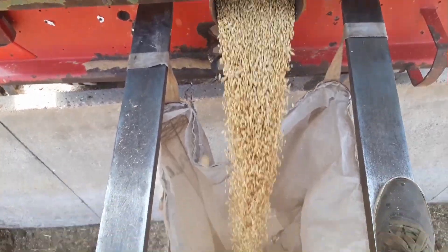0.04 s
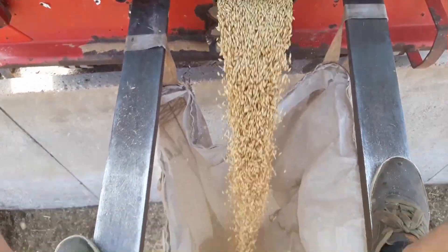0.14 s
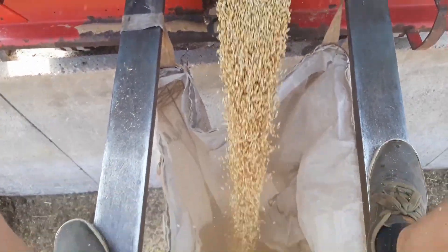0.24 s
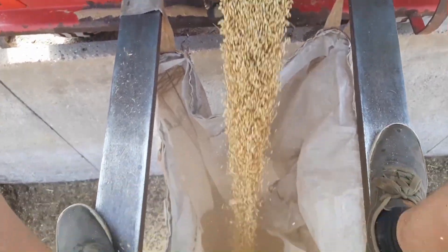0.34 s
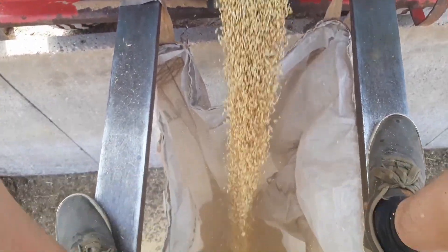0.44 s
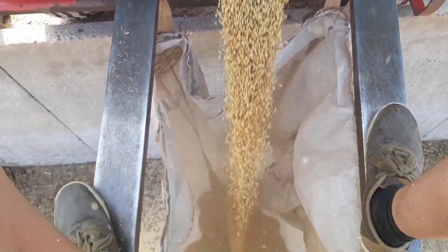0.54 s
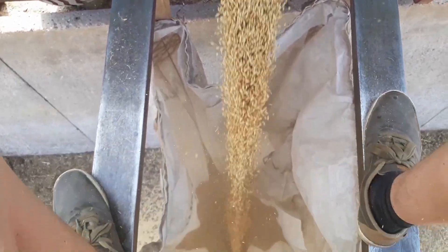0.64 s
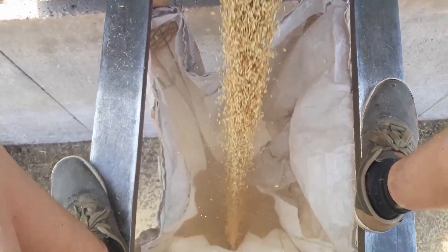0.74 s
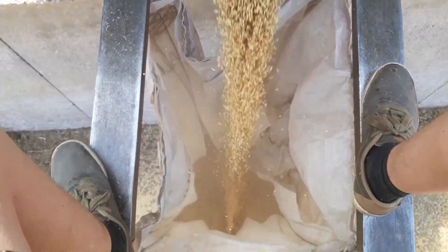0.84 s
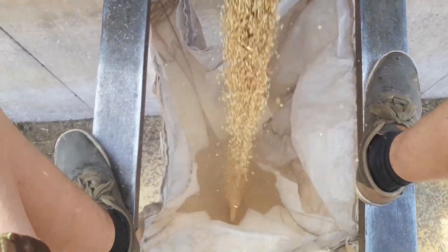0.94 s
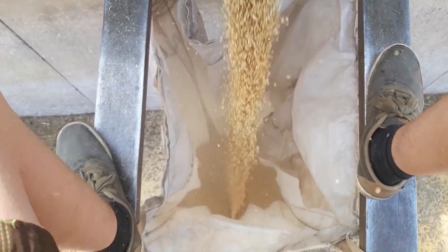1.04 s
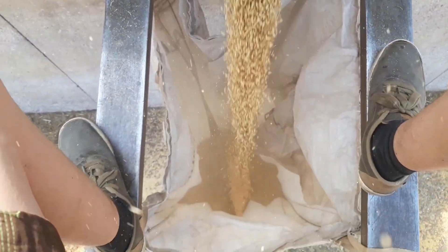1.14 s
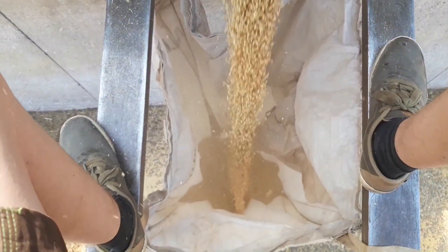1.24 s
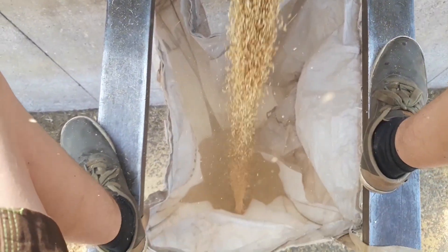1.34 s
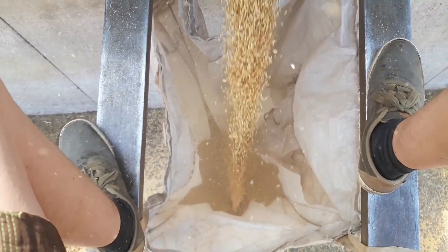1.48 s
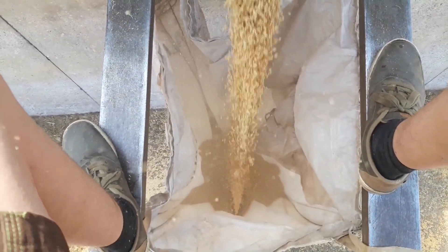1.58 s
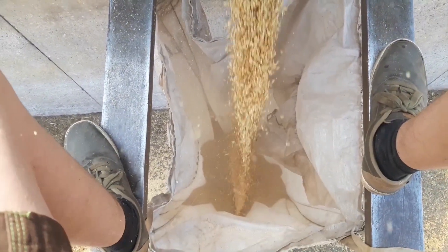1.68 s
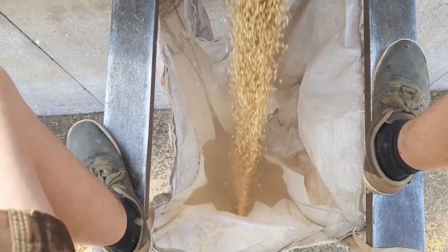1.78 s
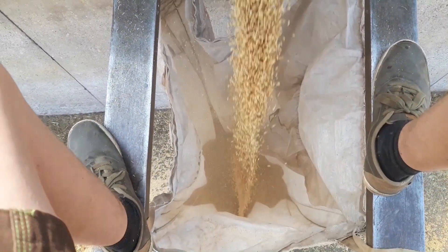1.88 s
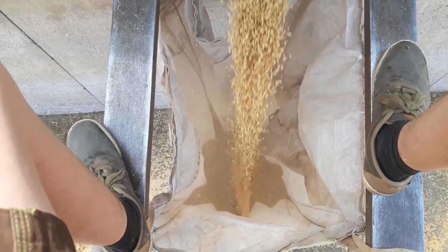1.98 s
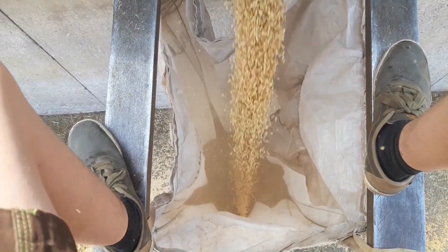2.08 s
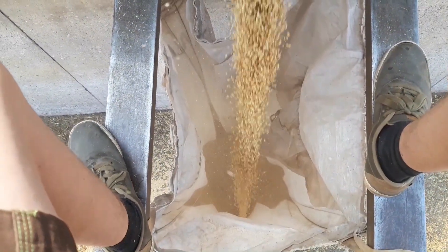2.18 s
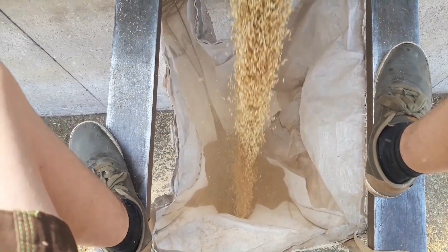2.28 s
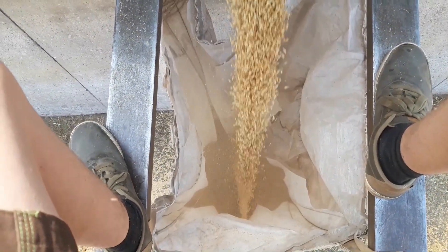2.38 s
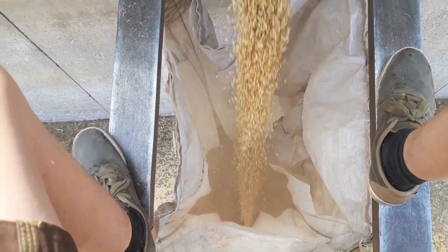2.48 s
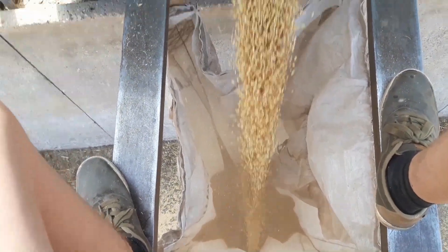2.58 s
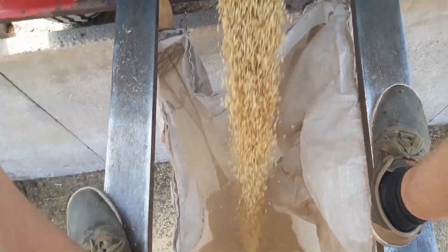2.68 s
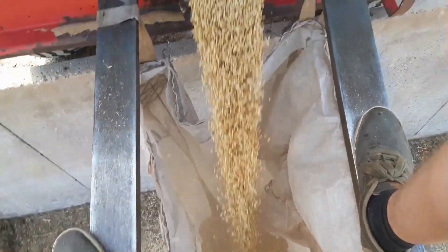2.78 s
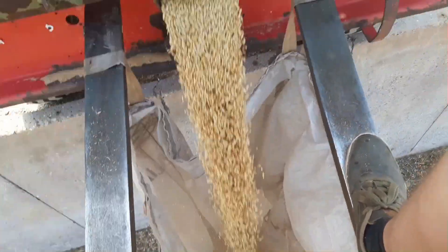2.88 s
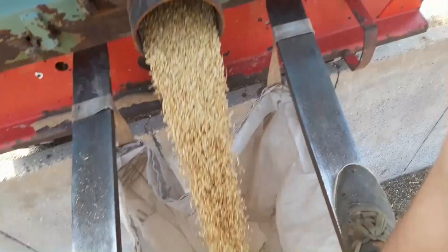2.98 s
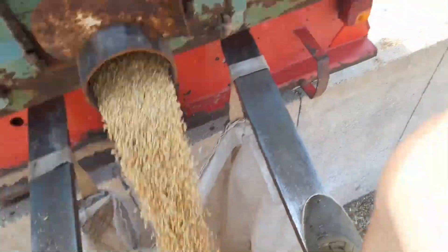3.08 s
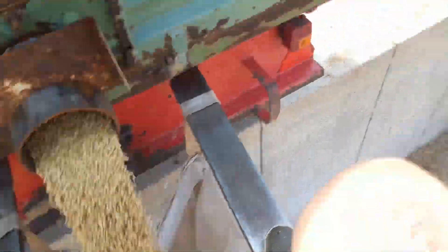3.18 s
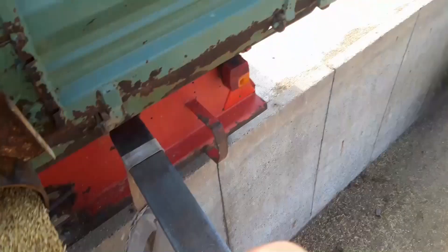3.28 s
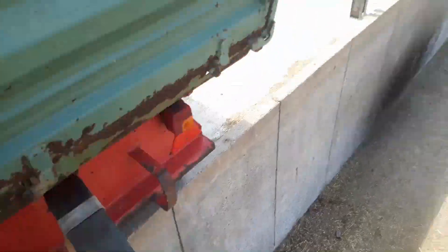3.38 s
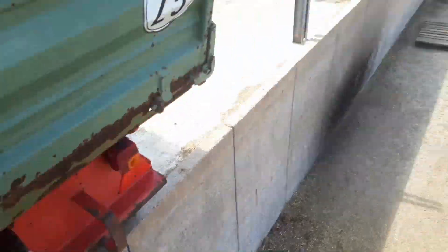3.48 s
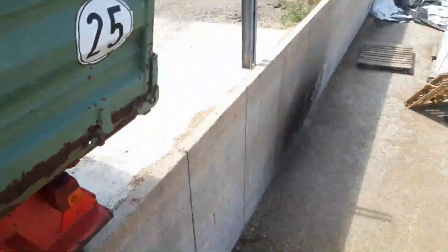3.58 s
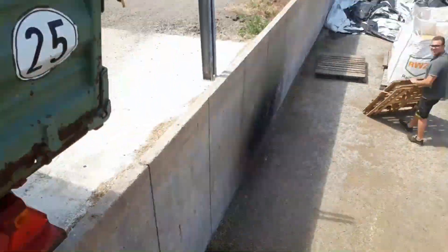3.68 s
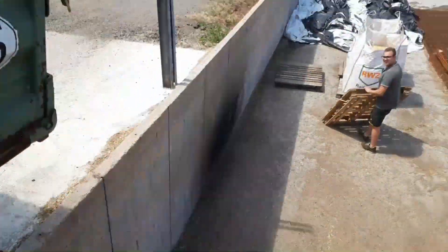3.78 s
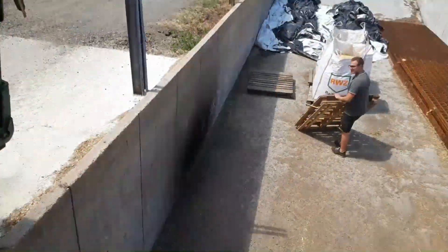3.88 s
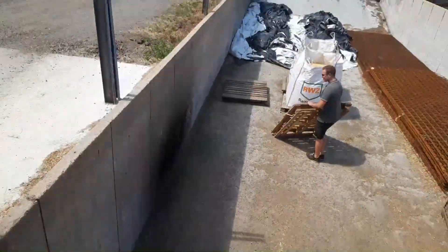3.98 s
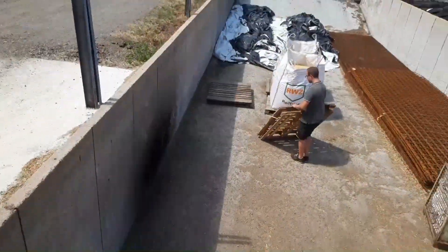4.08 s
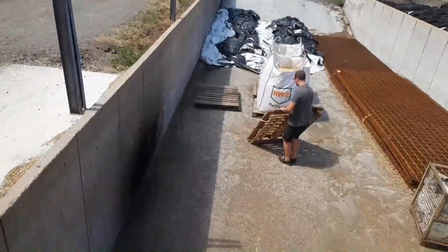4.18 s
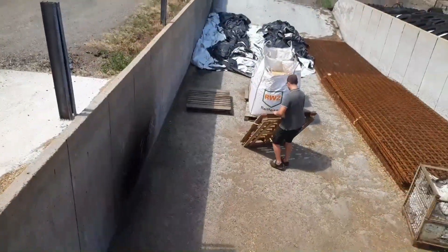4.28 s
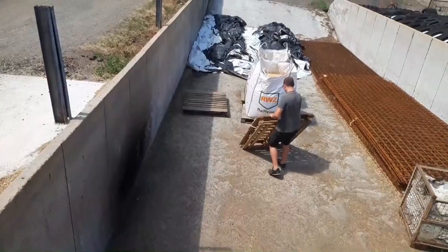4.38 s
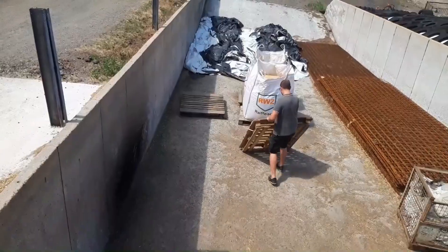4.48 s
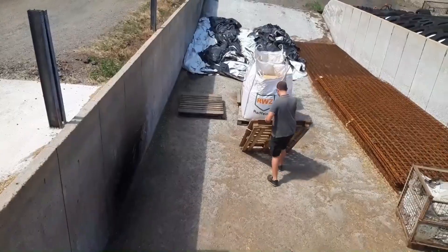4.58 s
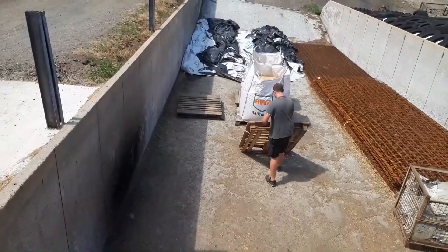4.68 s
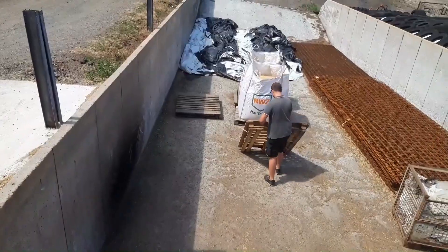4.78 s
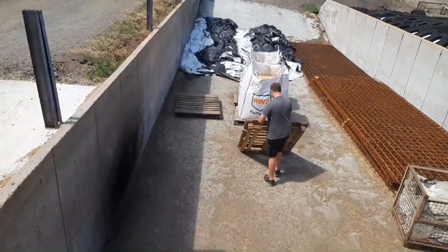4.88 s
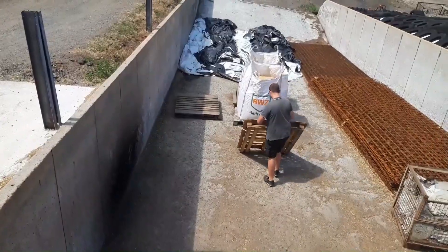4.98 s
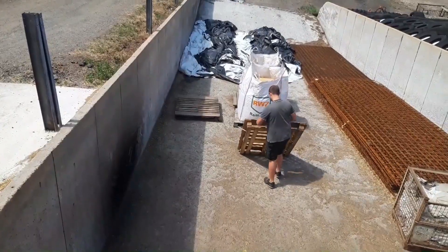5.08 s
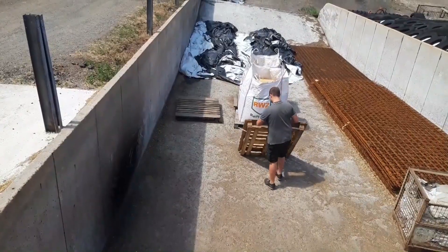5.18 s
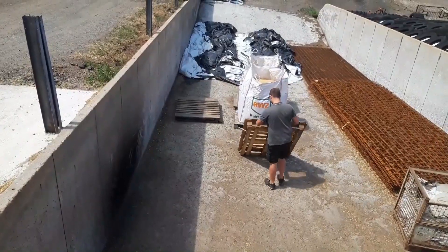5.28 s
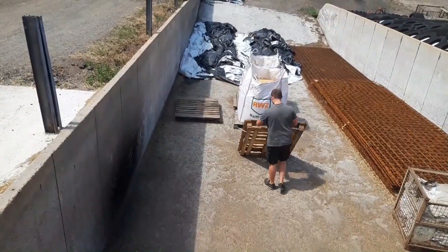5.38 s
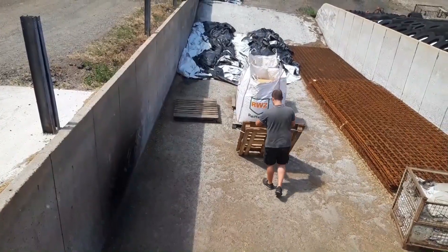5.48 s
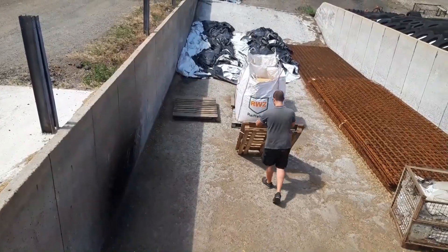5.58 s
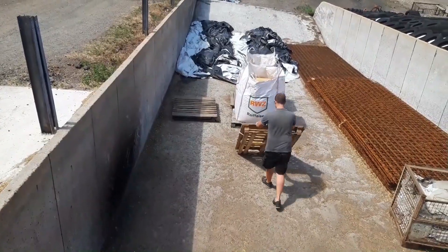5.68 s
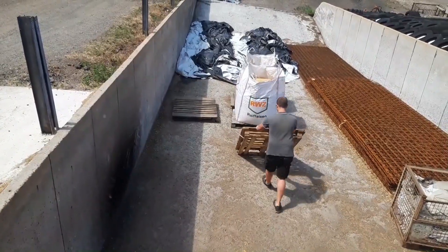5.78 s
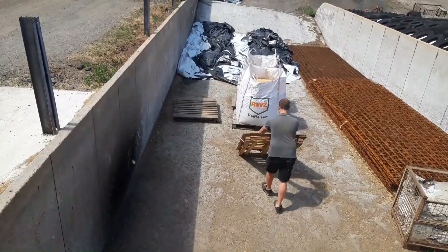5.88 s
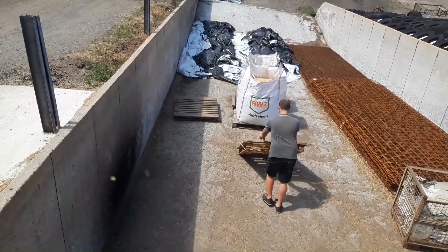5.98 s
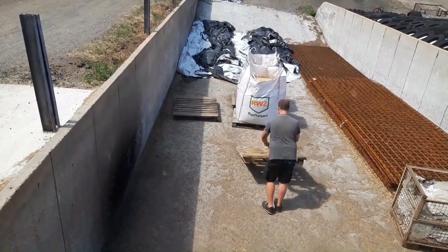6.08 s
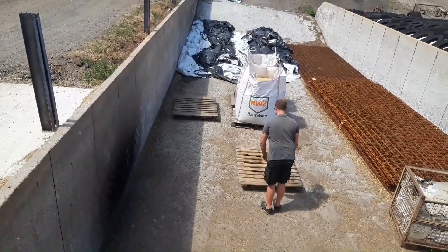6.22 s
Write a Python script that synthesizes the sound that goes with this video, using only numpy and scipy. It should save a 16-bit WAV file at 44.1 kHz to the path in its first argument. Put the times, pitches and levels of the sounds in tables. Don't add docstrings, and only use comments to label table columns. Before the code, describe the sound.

Close above a large woven bag in an open farmyard, dry grain rushes from a steel outlet in a dense bright patter with lumpy surges. Cloth slaps, soft bag thumps, steel pings and rattles over the lip stand out. Around 3.5 seconds the microphone swings away; the patter sinks, a steady hiss remains, a pallet clinks further off at 4.5 seconds, and faint pings continue.

```python
import sys
import numpy as np
from scipy import signal
from scipy.io import wavfile
from scipy.ndimage import uniform_filter1d

SR = 44100
rng = np.random.default_rng(int(sys.argv[2]) if len(sys.argv) > 2 else 0)


def boost_factor(decibels):
    exponent = np.asarray(decibels, float) / 20
    return 10 ** exponent


def unload_wav(signal):
    wavfile.write(
        sys.argv[1],
        SR,
        np.round(np.clip(np.atleast_2d(signal).T, -1, 1) * 32767).astype(np.int16),
    )


N = 275620


def evened(x):
    return x / np.sqrt(np.mean(x ** 2) + 1e-20)


def colour(x, points, ridges=(), size=4096):
    point_hz, point_db = np.transpose(points)
    hz = abs(np.fft.fftfreq(size, 1 / SR))
    db = np.interp(np.log(hz + 1), np.log(point_hz + 1), point_db)
    for at_hz, width_hz, lift_db in ridges:
        db = db + lift_db / (1 + (2 * (hz - at_hz) / width_hz) ** 2)
    log_gain = np.log(boost_factor(db))
    phase = -signal.hilbert(log_gain).imag
    taps = np.fft.ifft(np.exp(log_gain + 1j * phase)).real
    return evened(signal.oaconvolve(x, taps[:size // 2])[:N])


def drift(t, low_hz, high_hz, count=40):
    hz = np.geomspace(low_hz, high_hz, count) * rng.uniform(0.94, 1.05, count)
    cycles = np.outer(t, hz) + rng.random(count)
    return evened(np.sin(2 * np.pi * cycles).sum(1))


def bursts(t, per_s, decay_s):
    step = t[1] - t[0]
    starts = np.minimum(rng.exponential(1, len(t)), 2.5) * (rng.random(len(t)) < per_s * step)
    trail = signal.lfilter([1], [1, -np.exp(-step / decay_s)], starts)
    return evened(trail - uniform_filter1d(trail, 120))


def patches(bins, frames, bins_wide, frames_long):
    field = rng.standard_normal((frames, bins))
    field = uniform_filter1d(field, frames_long, 0)
    return evened(uniform_filter1d(field, bins_wide, 1)).T


def kernels(per_s, spread_db, blur):
    size = boost_factor(spread_db * np.minimum(rng.exponential(1, N), 4.5))
    landed = rng.random(N) < per_s / SR
    taps = evened(size * rng.choice([-1., 1.], N) * landed)
    return np.sqrt(1 - blur) * taps + np.sqrt(blur) * rng.standard_normal(N)


def swells(t, rows, tail):
    peak_s, db, half_s = np.transpose(rows)[:3, :, None]
    half_s = np.where(t > peak_s, half_s * tail, half_s)
    return boost_factor(2 * db) * np.exp(-((t - peak_s) / half_s) ** 2)


def blows(events, rise_s, octaves, scatter_db, trim_db):
    out = np.zeros(N + SR)
    t = np.arange(SR // 5) / SR
    for start_s, db, hz, t60_s in events:
        shape = (1 - np.exp(-t / rise_s)) * boost_factor(-60 * t / np.clip(t60_s, .01, .4))
        ring = np.sin(2 * np.pi * (hz * t + rng.random()))
        band = signal.butter(2, hz * 2. ** np.array([-octaves, octaves]), "band", fs=SR)
        scatter = evened(signal.lfilter(*band, rng.standard_normal(len(t))))
        blow = shape / shape.max() * (ring + boost_factor(scatter_db) * scatter)
        at = round(start_s * SR)
        out[at:at + len(t)] += boost_factor(db + trim_db) * blow
    return out[:N]


# peak time in seconds, level in dB, half-length in seconds.
GUSTS = [(0.12, -61, 0.13), (0.7, -57, 0.23), (1.65, -58, .12), (2.05, -58.5, 0.3), (2.75, -58, .12),
         (3.05, -63, .15), (3.757, -53, .13), (4.688, -52, 0.14), (5.3, -61, .08), (6.08, -60, 0.051),
         (0.95, -60, .1), (3.4, -61.5, .05), (4.15, -66, .1)]
# frequency in Hz, level in dB per Hz.
AIR_SPECTRUM = [(18, -47), (30, -17), (108, 5.5), (150, 5), (200, -27), (330, -120)]


def moving_air():
    t, slow = np.arange(N) / SR, np.arange(0, N / SR + 1, .005)
    calm_db = -64
    air_db = 10 * np.log10(boost_factor(2 * calm_db) + swells(slow, GUSTS, 1).sum(0))
    air_db = np.interp(t, slow, air_db + 3.2 * drift(slow, 3, 18))
    return boost_factor(air_db) * colour(kernels(90, 1.5, 0.98), AIR_SPECTRUM)


# frequency in Hz, level in dB per Hz.
BAG_SPECTRUM = [(88, -24), (150, -10), (199, 0), (264, -3.5), (365, 0.5), (420, -1.5), (520, -6.5),
                (680, -22), (1140, -120)]
# frequency in Hz, width in Hz, lift in dB.
BAG_RIDGES = [(338, 67, 5.5)]


def bag_rustle():
    t, slow = np.arange(N) / SR, np.arange(0, N / SR + 1, .005)
    pour_s, pour_db, _ = np.transpose(POUR)
    usual_db, follows, gust_db = -46, 0.38, 1.5
    filling_db = usual_db + follows * (np.interp(slow, pour_s, pour_db) - USUAL_HEAP_DB)
    bag_db = 10 * np.log10(boost_factor(2 * filling_db) + boost_factor(2 * gust_db) * swells(slow, GUSTS, 1).sum(0))
    bag_db = np.interp(t, slow, bag_db + 1.7 * drift(slow, 2.4, 30))
    return boost_factor(bag_db) * colour(kernels(600, 1.4, 0.9), BAG_SPECTRUM, BAG_RIDGES)


# start in seconds, peak level in dB, pitch in Hz, time to fade by 60 dB in seconds.
CLINKS = [(4.4835, -27, 2260, .06), (4.503, -29, 2150, 0.037), (4.5835, -23, 4100, 0.043),
          (4.6005, -16, 5170, 0.04), (4.6005, -24, 4520, 0.056), (4.647, -21, 3010, .05)]


def pallet_clinks():
    return blows(CLINKS, rise_s=0.00085, octaves=0.3, scatter_db=-9, trim_db=0.26)


# start in seconds, peak level in dB, pitch in Hz, time to fade by 60 dB in seconds.
KNOCKS = [(1.17, -29, 800, .12), (2.01, -22.5, 710, 0.092), (3.02, -26, 707, 0.51),
          (3.209, -21.5, 900, .07), (3.379, -19.5, 802, 0.17), (3.39, -26, 1290, 0.096),
          (4.14, -40.5, 900, 0.066), (6.13, -27.5, 1120, 0.098)]


def frame_knocks():
    return blows(KNOCKS, rise_s=0.0024, octaves=0.89, scatter_db=3.56, trim_db=-13.5)


# start in seconds, peak level in dB, pitch in Hz, time to fade by 60 dB in seconds.
RATTLES = [(0.07, -19.5, 4100, .38), (1.17, -24, 4100, 0.35), (2.07, -20.5, 4100, .38),
           (3.12, -22.5, 4100, .2), (2.56, -25, 3100, 0.22)]


def lip_rattles():
    return blows(RATTLES, rise_s=0.042, octaves=0.24, scatter_db=13.7, trim_db=-15.5)


# start in seconds, peak level in dB, pitch in Hz.
PINGS = [(0.5266, -1, 3330), (0.564, -1.5, 5730), (0.5933, -1.5, 3420), (0.774, -10, 4330),
         (1.1667, -6, 3340), (1.179, -5, 3790), (1.2, 2, 3340), (1.247, -3, 3950), (1.5035, -7, 3360),
         (1.551, -4, 3490), (2.0732, 1.5, 3260), (2.5604, -5.5, 3380), (2.605, -6, 3550),
         (2.818, -10, 3720), (2.8966, -5, 3030), (3.1247, -9, 4120), (3.224, -12, 4560), (3.4037, -9, 2530),
         (4.4466, -15, 3470), (4.4842, -12, 3600), (4.5017, -13.5, 4190), (4.583, -16, 3640),
         (4.586, -20, 5640), (4.601, -15, 2960), (4.7276, -12, 2700), (5.0148, -10, 3400),
         (5.499, -16, 3020), (5.9452, -15, 3280), (6.0497, -14, 3430), (6.1298, -12.5, 3400)]


def steel_pings():
    t60_s = 0.045
    events = [(*ping, t60_s) for ping in PINGS]
    return blows(events, rise_s=0.0019, octaves=0.44, scatter_db=-2.1, trim_db=-13.0)


# start in seconds, peak level in dB, pitch in Hz, time to fade by 60 dB in seconds.
BUMPS = [
    (1.245, -47, 112, 0.38),
    (3.86, -44, 111, 0.069),
    (6.04, -43, 70, 0.055),
]


def bag_bumps():
    return blows(BUMPS, rise_s=0.025, octaves=0.54, scatter_db=-8, trim_db=0.1)


# start in seconds, peak level in dB, pitch in Hz, time to fade by 60 dB in seconds.
THUMPS = [(0.338, -28.5, 265, 0.09), (0.556, -27, 245, 0.15), (0.773, -28, 314, 0.11),
          (0.995, -37, 328, 0.056), (1.594, -27.5, 130, 0.072), (1.654, -34, 225, 0.09),
          (1.781, -35, 250, 0.15), (2.003, -29, 159, 0.1), (2.378, -35.5, 160, 0.097),
          (2.508, -33, 216, 0.12), (2.577, -32, 106, 0.077), (2.664, -34, 198, 0.11),
          (2.771, -34, 120, 0.12), (2.903, -34, 326, 0.09), (3.001, -26, 126, 0.043),
          (3.203, -38, 129, 0.2), (3.375, -40, 214, 0.11), (3.638, -34, 115, 0.09), (3.739, -39, 130, 0.09),
          (4.232, -40, 114, 0.09), (4.77, -34, 312, 0.13), (6.098, -33, 298, 0.13)]


def bag_thumps():
    return blows(THUMPS, rise_s=0.0048, octaves=1.0, scatter_db=-0.78, trim_db=-6.5)


# start in seconds, peak level in dB, pitch in Hz, time to fade by 60 dB in seconds.
SLAPS = [(0.081, -13, 1990, 0.06), (0.607, -14, 1940, 0.047), (0.77, -14, 1940, 0.11),
         (1.167, -21, 2180, 0.06), (2.01, -10.5, 1590, 0.056), (2.283, -18, 2150, 0.055),
         (2.612, -15, 1910, 0.043), (3.207, -8, 1590, 0.036), (3.386, -11.5, 1710, 0.042),
         (4.487, -27, 2230, 0.055)]


def cloth_slaps():
    return blows(SLAPS, rise_s=0.0021, octaves=0.7, scatter_db=-1, trim_db=-11.0)


# time in seconds, patter on the heap in dB,
# hardness of the landing in dB per octave across the patter.
POUR = [(0.0, -21, -2), (0.4, -21, 4), (0.68, -19.5, 6), (0.9, -20.5, -0.5), (1.08, -22.5, 7.5),
        (1.55, -24.5, 2), (1.88, -22.5, 1), (2.2, -17, -4.5), (2.42, -21.5, -2.5), (2.72, -27, -4),
        (2.95, -23, -1), (3.2, -22.5, -1), (3.33, -26, 1), (3.8, -28.5, 2), (4.05, -31.5, 0.3),
        (4.4, -29.5, 2), (5.1, -29, -1), (5.9, -30.5, 3)]
# peak time in seconds, level in dB, half-length in seconds,
# hardness in dB per octave.
SURGES = [(0.115, -18, 0.034, 3), (0.293, -24, 0.012, 1.5), (0.55, -23, 0.034, -2), (0.604, -30, 0.027, 0),
          (0.776, -19.5, 0.027, -5), (1.203, -15, 0.038, 0.3), (1.287, -21.5, 0.09, -3),
          (1.445, -32, 0.016, 1.5), (1.78, -27.5, 0.056, 6), (1.962, -18.5, 0.026, -4),
          (2.02, -16, 0.016, 9), (2.1, -19.5, 0.027, 7), (2.164, -19, 0.068, 9), (2.312, -16.5, .03, -1),
          (2.47, -22, 0.033, 3), (2.599, -21, 0.047, -2), (2.756, -28.5, .04, -2), (2.914, -29, 0.019, -2),
          (3.038, -19.5, 0.013, 2), (3.088, -24, 0.017, -2), (3.138, -22, 0.022, 5), (3.228, -19, 0.021, 3),
          (3.395, -31, 0.033, -3), (3.46, -33, 0.013, 6), (3.578, -25, 0.05, 1), (4.152, -28.5, 0.036, -2),
          (4.497, -33, 0.019, 1), (5.447, -33, 0.069, 2), (5.046, -33.5, 0.038, 10),
          (6.21, -32.5, 0.057, 1.5)]
USUAL_HEAP_DB = -21


def landing(t):
    pour_s, steady_db, steady_hardness = np.transpose(POUR)
    steady = boost_factor(2 * np.interp(t, pour_s, steady_db))
    slugs = swells(t, SURGES, 1.4)
    power = steady + slugs.sum(0)
    hardness = steady * np.interp(t, pour_s, steady_hardness) + np.transpose(SURGES)[3] @ slugs
    return 10 * np.log10(power), hardness / power


# lowest frequency in Hz, highest frequency in Hz.
PARTS_HZ = [
    (550, 2000),
    (2200, 5200),
    (5500, 8500),
    (10500, 15700),
]


def played(x, field_db, levels_db):
    hz, _, z = signal.stft(x, SR, nperseg=256, noverlap=192)
    whole = (abs(z) ** 2).mean(1)
    own_db = [10 * np.log10(whole[(hz > lo) & (hz < hi)].sum() / whole.sum()) for lo, hi in PARTS_HZ]
    flat_hz = np.log(np.ravel(PARTS_HZ) * np.tile([1.15, 1 / 1.15], len(PARTS_HZ)))
    shares = [np.interp(np.log(hz + 1), flat_hz, np.repeat(row, 2)) for row in np.eye(len(PARTS_HZ))]
    lift_db = np.transpose(shares) @ (levels_db - np.array(own_db)[:, None])
    return z * boost_factor(lift_db + field_db)


# frequency in Hz, level in dB per Hz.
FACING = [(310, -45), (520, -20.5), (808, -14.5), (893, -15.5), (1430, -14), (1560, -13.5), (1740, -11),
          (1900, -9.5), (3400, -1), (7030, -13.5), (10000, -26), (12200, -15), (15600, -14.5)]
# frequency in Hz, level in dB per Hz.
AWAY = [(310, -24), (520, -6.5), (635, -8.5), (1110, -4), (1310, -8), (1490, -5), (1720, -6.5),
        (3350, -1.5), (4860, -9.5), (5290, -8), (10300, -16.5), (13000, -3), (15600, -4)]
# frequency in Hz, width in Hz, lift in dB.
FACING_RIDGES = [(811, 7.7, 8), (1590, 32, 4.5), (3550, 170, -0.5), (4230, 1100, 3.5), (4900, 150, 2.5),
                 (6120, 88, -2), (6940, 240, 1.5)]
AWAY_RIDGES = [(1190, 48, 3.6), (1576, 170, 4.5), (3400, 83, 1.1), (5060, 120, 0.5)]
# time in seconds, share turned away from 0 to 1.
TURN = [
    (3.3, 0.02),
    (3.9, 0.85),
]
# time in seconds, hiss in dB.
CHUTE = [(0.0, -33.5), (0.35, -32.5), (0.57, -29), (0.75, -29), (0.9, -32), (1.25, -33), (1.55, -34.5),
         (1.85, -35.5), (2.35, -34), (2.55, -36), (2.85, -37.5), (3.05, -32.5), (3.3, -35), (3.75, -34),
         (4.0, -35), (4.35, -36), (5.0, -35), (6.25, -35.5)]
# peak time in seconds, lift of the brittle edge in dB,
# half-length in seconds.
SWING = [
    (2.8, 0.2, .15),
    (3.15, -4.5, 0.14),
    (3.55, 3, 0.21),
]
CLUMP_DB = [0.98, 1.06, 0.61, .25]


def stream():
    hz, t, _ = signal.stft(np.zeros(N), SR, nperseg=256, noverlap=192)
    heap_db, hardness = landing(t)
    chute_db = np.interp(t, *np.transpose(CHUTE))
    away = np.clip(np.interp(t, *np.transpose(TURN)), 0, 1)

    more_heap, more_chute = heap_db - USUAL_HEAP_DB, chute_db + 33
    cloth_db = -35 + 1.18 * more_heap + 0.07 * more_chute + 7.5 * np.sqrt(away)
    edge_db = -26 + 0.58 * more_heap + 0.79 * more_chute
    for peak_s, lift_db, half_s in SWING:
        edge_db = edge_db + lift_db * np.exp(-((t - peak_s) / half_s) ** 2)

    clumps = 0.79 * drift(t, 9.9, 70) + 0.5 * bursts(t, 70, 0.0055)
    own_lumps_db = np.array([db * drift(t, 8.4, 55) for db in (0.73, 0.42, 0.43, 0.42)])
    levels_db = np.array([cloth_db, heap_db, edge_db, chute_db]) + np.outer(CLUMP_DB, clumps) + own_lumps_db

    octaves = np.log2((hz + 1) / 3500)
    slope = octaves * np.exp(-2 * octaves ** 2)
    blotchy_db = np.interp(hz, [6500, 10000], [1.3, .5])[:, None] * patches(len(hz), len(t), 2, 80)
    field_db = np.outer(slope, hardness) + blotchy_db * (1 - 0.12 * away)

    split_hz = 7000
    impacts = signal.lfilter(*signal.butter(2, split_hz, fs=SR), kernels(5000, 2.8, 0.27))
    hiss = signal.lfilter(*signal.butter(2, split_hz, "high", fs=SR), rng.standard_normal(N))
    grain = impacts + hiss
    facing = played(colour(grain, FACING, FACING_RIDGES), field_db, levels_db)
    behind = played(colour(grain, AWAY, AWAY_RIDGES), field_db, levels_db)
    return signal.istft((1 - away) * facing + away * behind, SR, nperseg=256, noverlap=192)[1][:N]


def scene():
    background = moving_air() + bag_rustle() + pallet_clinks()
    steel = frame_knocks() + lip_rattles() + steel_pings()
    bag = bag_bumps() + bag_thumps() + cloth_slaps()
    return np.tile(background + steel + bag + stream(), (2, 1))


def band_limit(x):
    return signal.sosfilt(signal.butter(12, 17080, fs=SR, output="sos"), x)


def record(dry):
    ceiling, top_hz = 0.95, 15735
    thin = signal.sosfilt(signal.butter(3, 55, "high", fs=SR, output="sos"), dry)
    limited = ceiling * np.tanh(thin / ceiling)
    top_filter = signal.firwin(2047, top_hz, window=("kaiser", 11), fs=SR)
    limited = signal.oaconvolve(limited, top_filter[None], "same")
    return band_limit(limited)


dry = scene()
out = record(dry)
unload_wav(out)
```